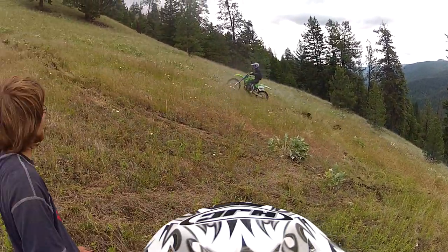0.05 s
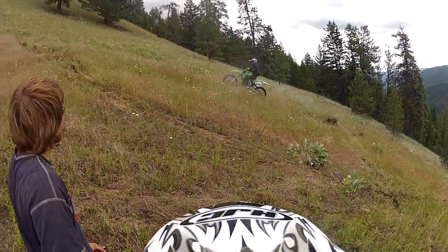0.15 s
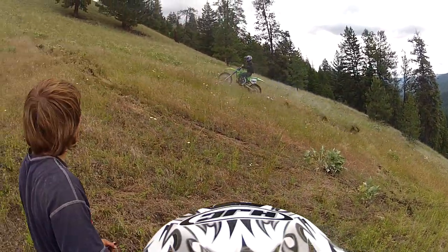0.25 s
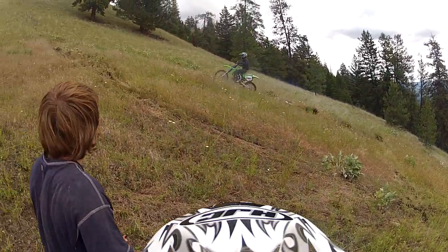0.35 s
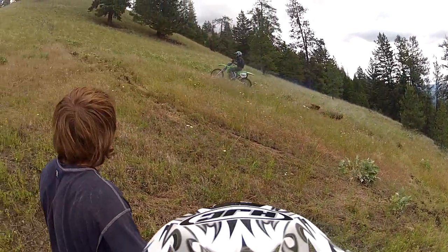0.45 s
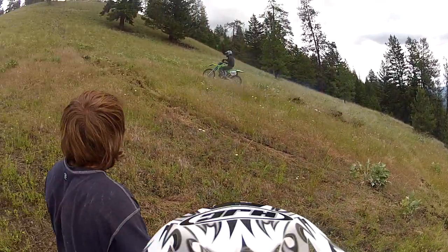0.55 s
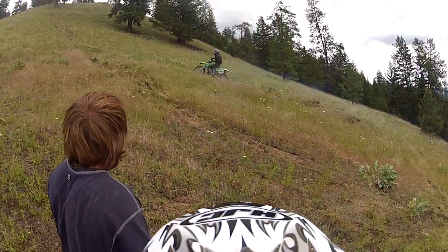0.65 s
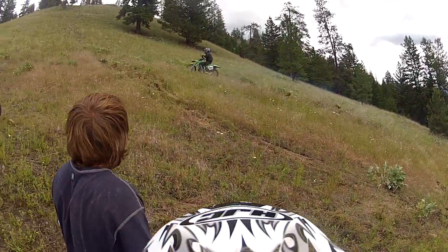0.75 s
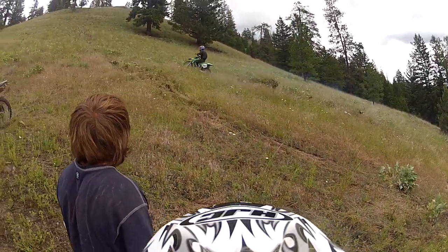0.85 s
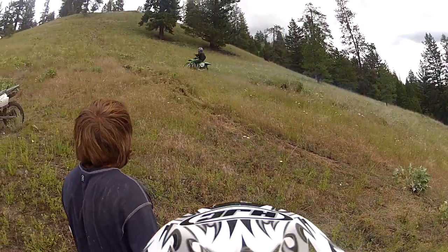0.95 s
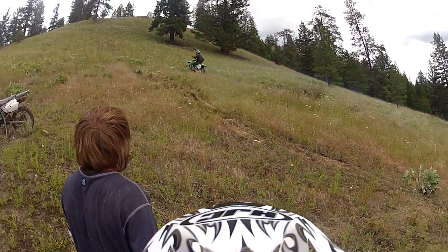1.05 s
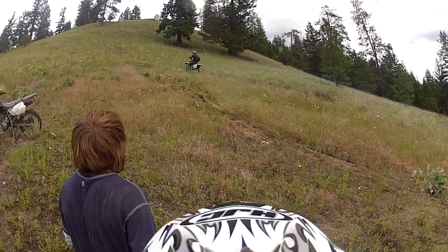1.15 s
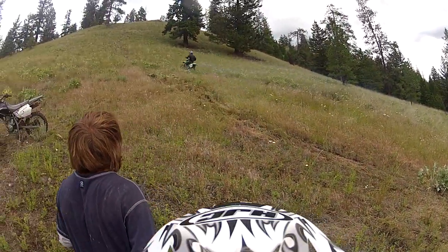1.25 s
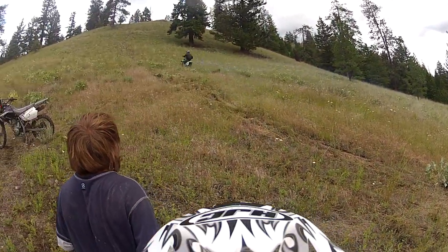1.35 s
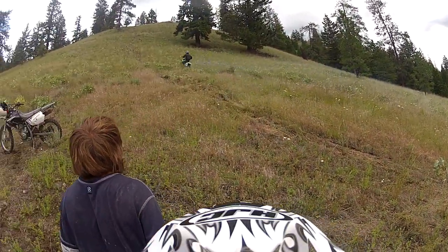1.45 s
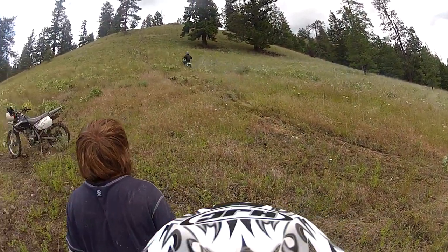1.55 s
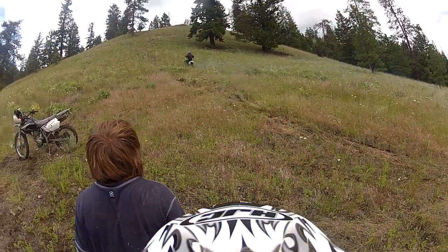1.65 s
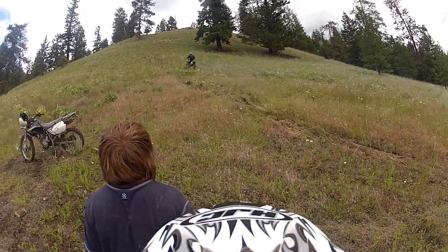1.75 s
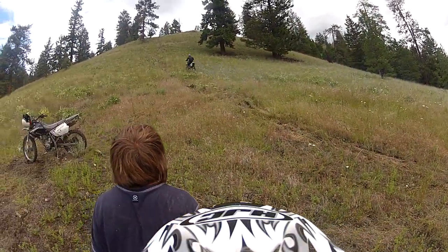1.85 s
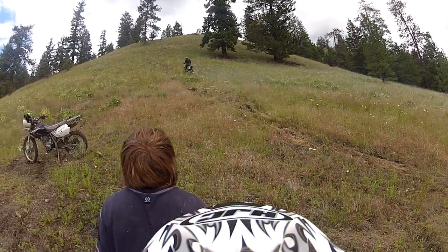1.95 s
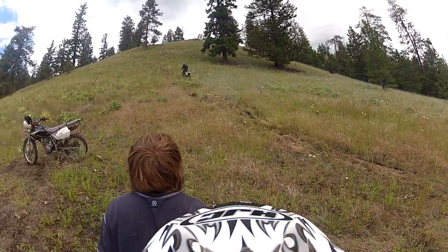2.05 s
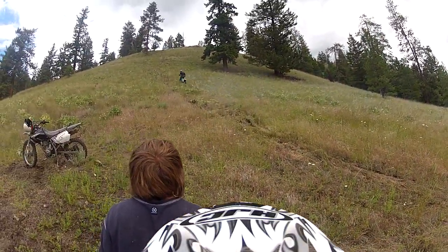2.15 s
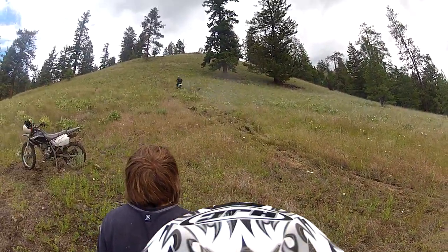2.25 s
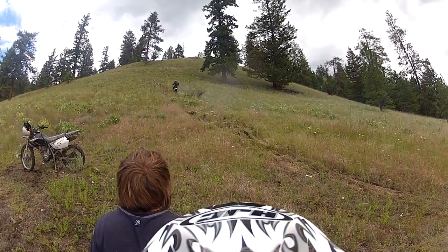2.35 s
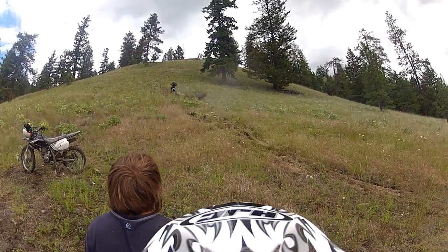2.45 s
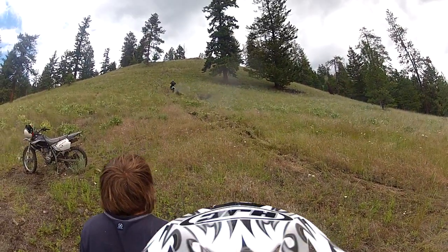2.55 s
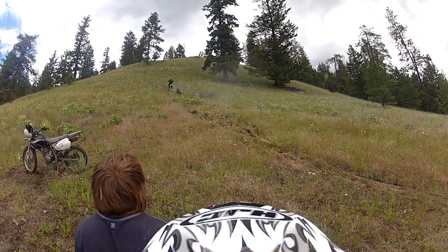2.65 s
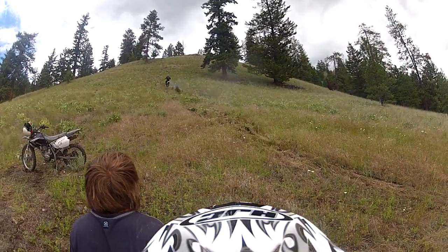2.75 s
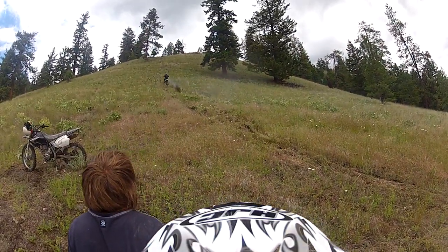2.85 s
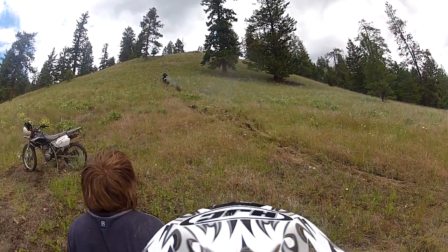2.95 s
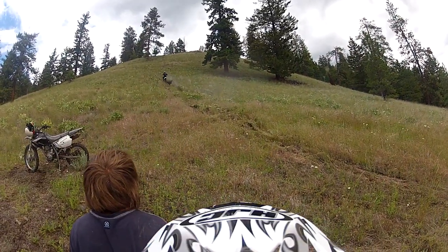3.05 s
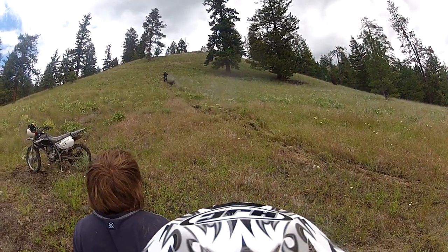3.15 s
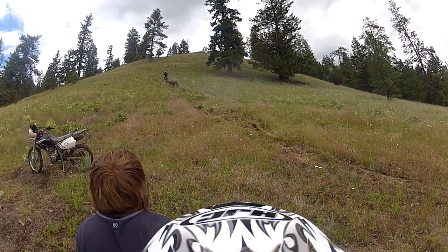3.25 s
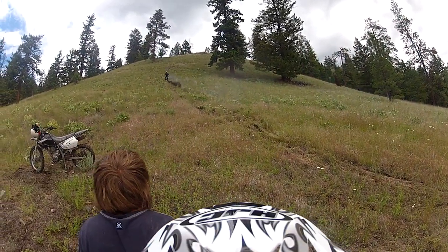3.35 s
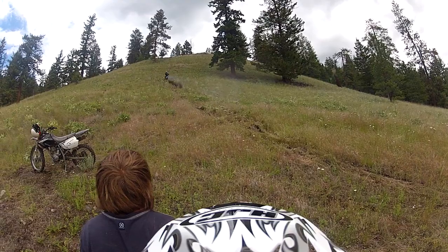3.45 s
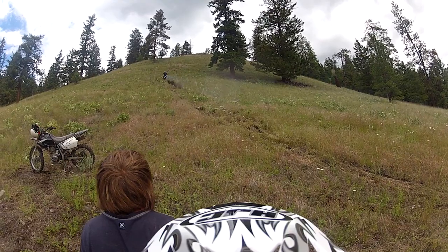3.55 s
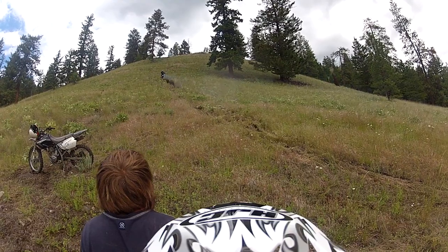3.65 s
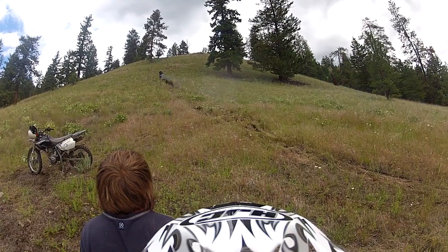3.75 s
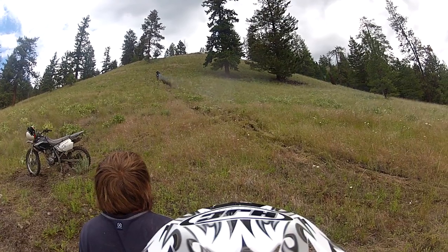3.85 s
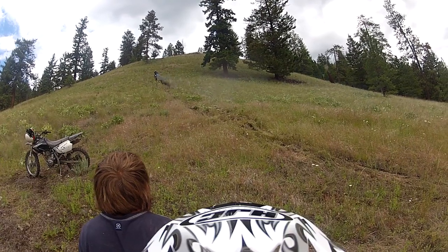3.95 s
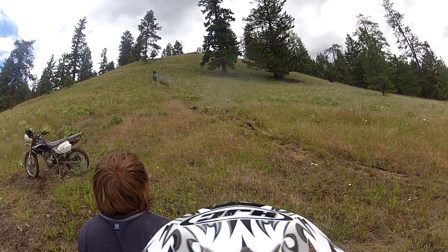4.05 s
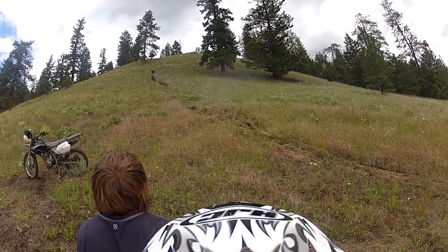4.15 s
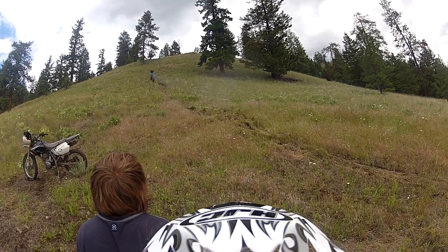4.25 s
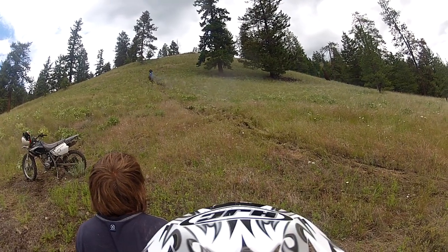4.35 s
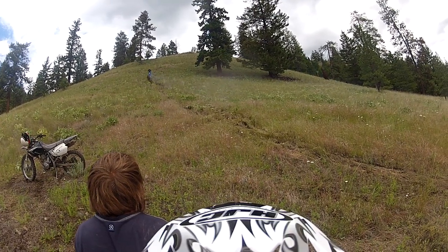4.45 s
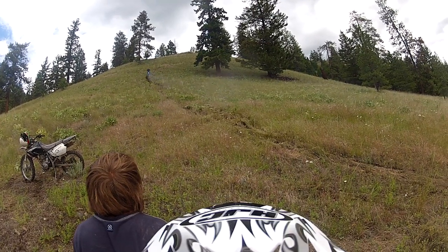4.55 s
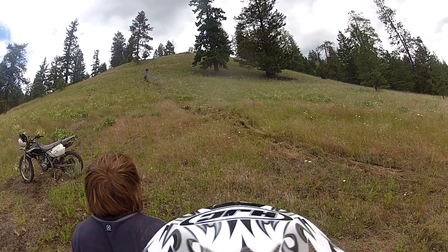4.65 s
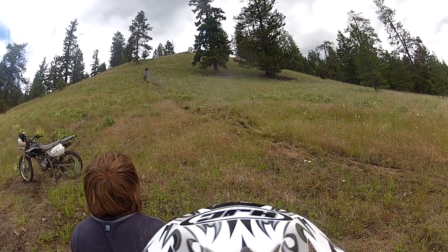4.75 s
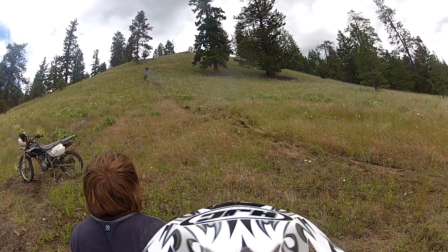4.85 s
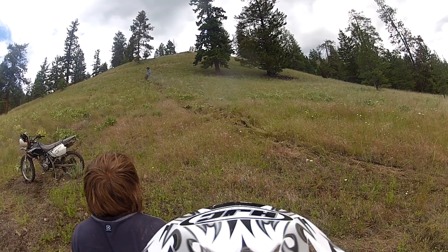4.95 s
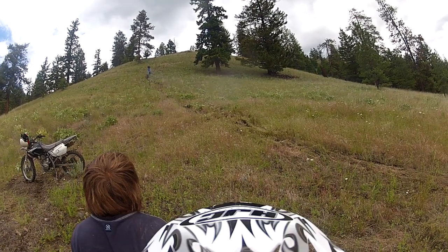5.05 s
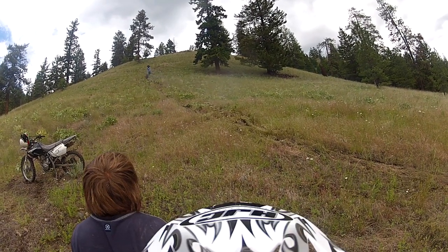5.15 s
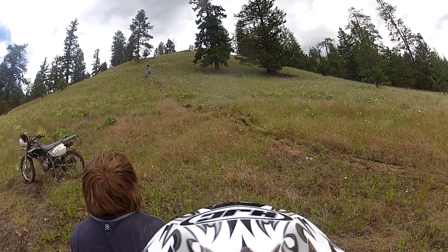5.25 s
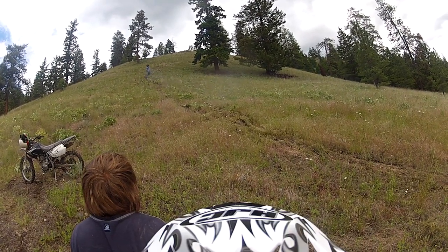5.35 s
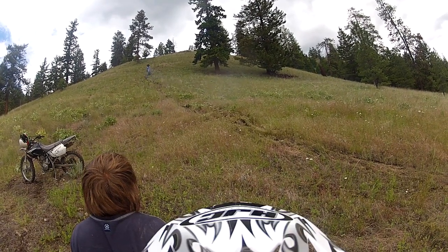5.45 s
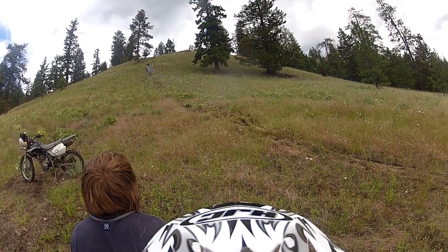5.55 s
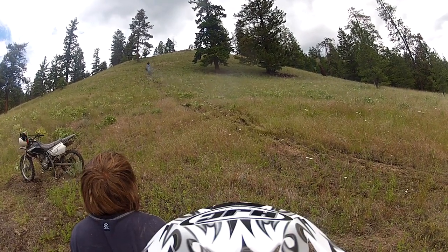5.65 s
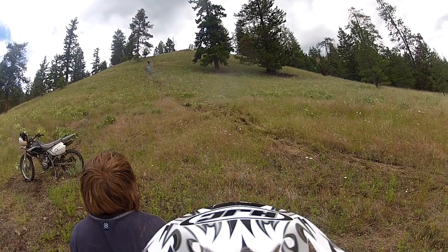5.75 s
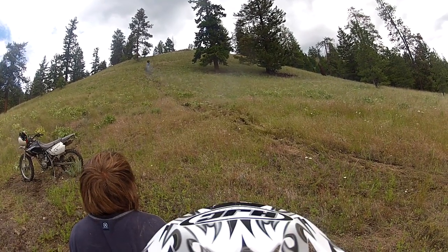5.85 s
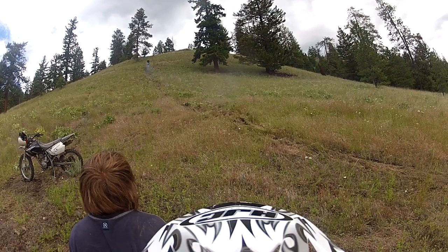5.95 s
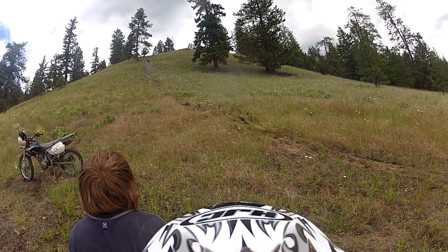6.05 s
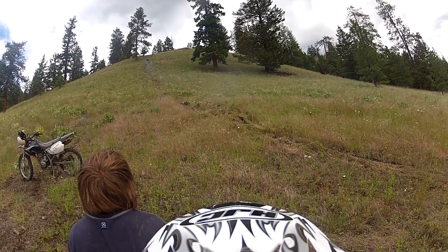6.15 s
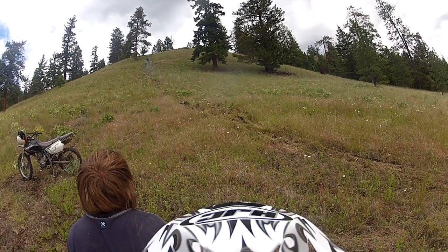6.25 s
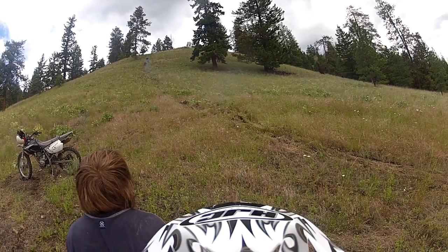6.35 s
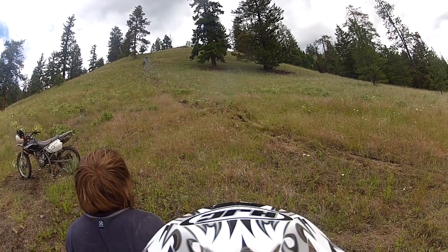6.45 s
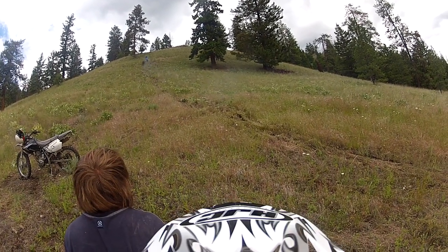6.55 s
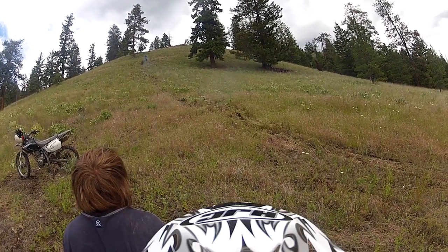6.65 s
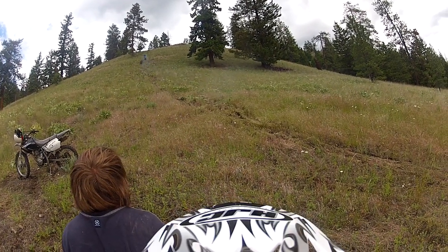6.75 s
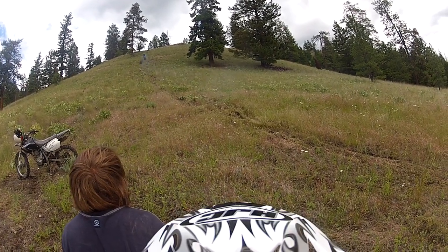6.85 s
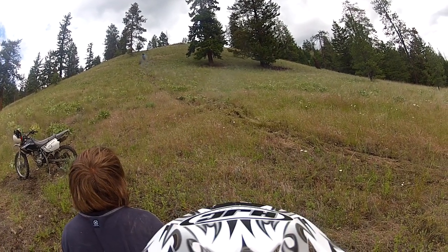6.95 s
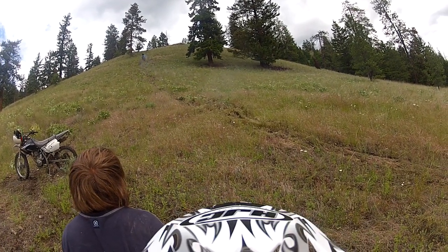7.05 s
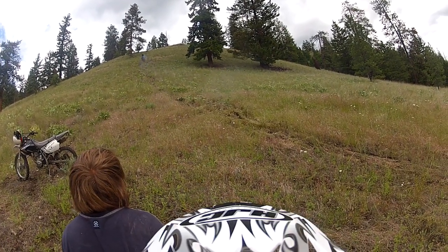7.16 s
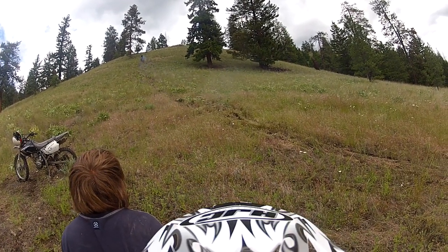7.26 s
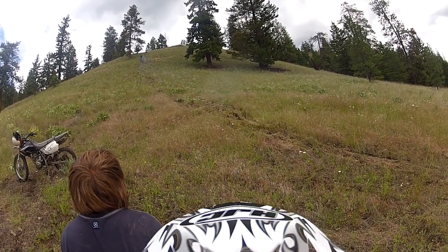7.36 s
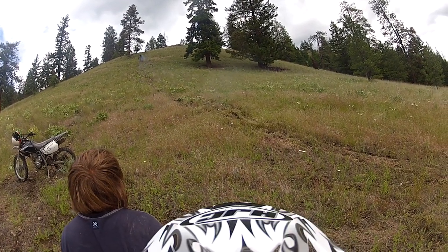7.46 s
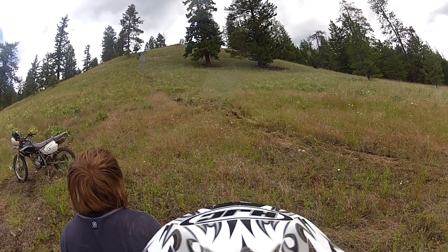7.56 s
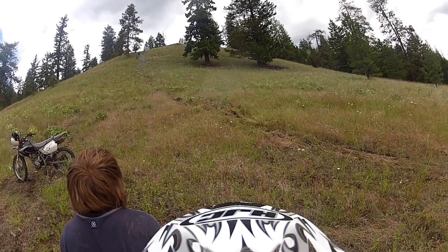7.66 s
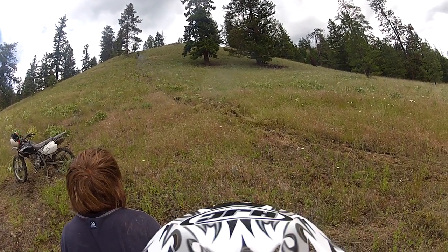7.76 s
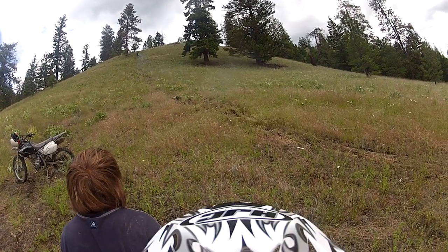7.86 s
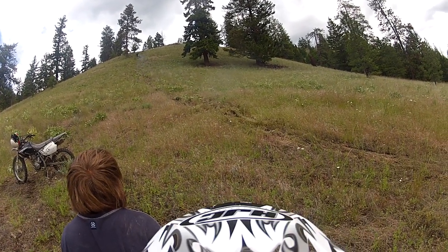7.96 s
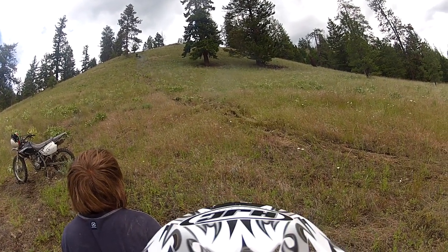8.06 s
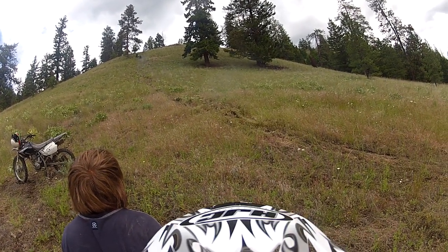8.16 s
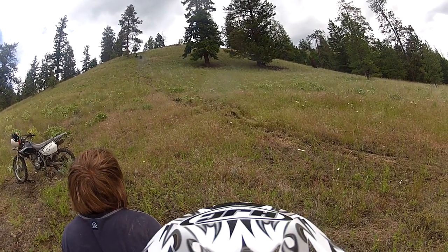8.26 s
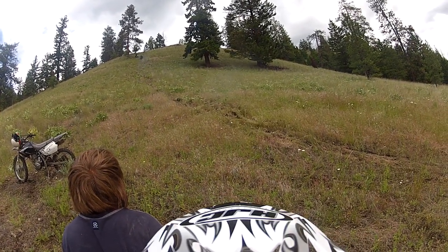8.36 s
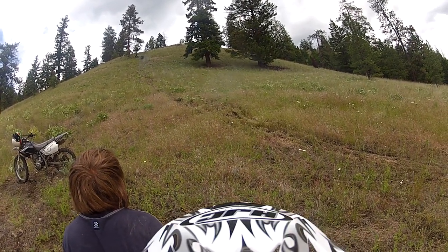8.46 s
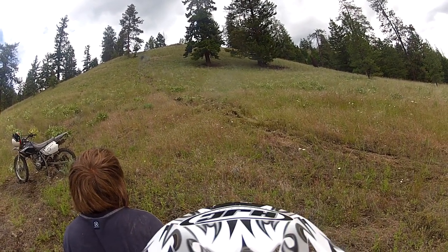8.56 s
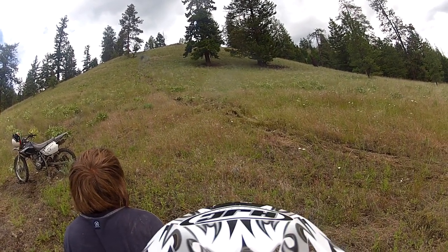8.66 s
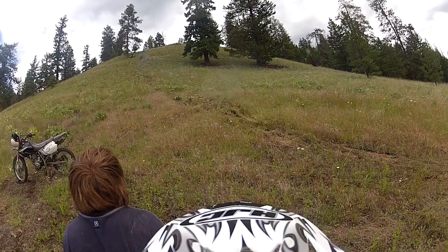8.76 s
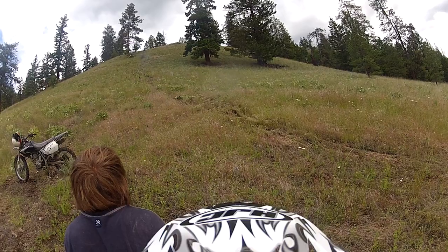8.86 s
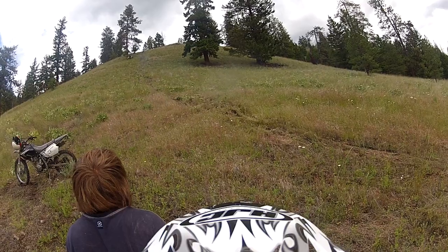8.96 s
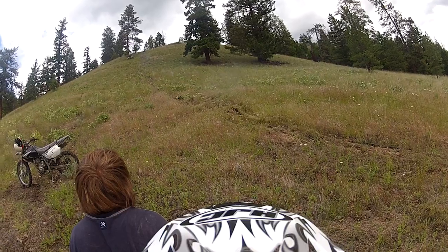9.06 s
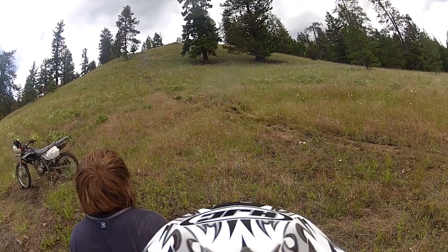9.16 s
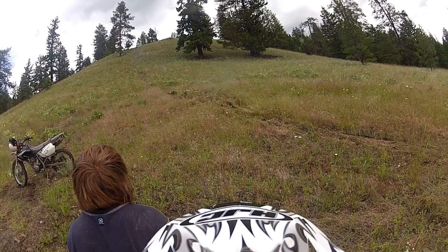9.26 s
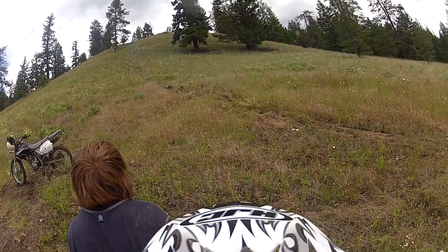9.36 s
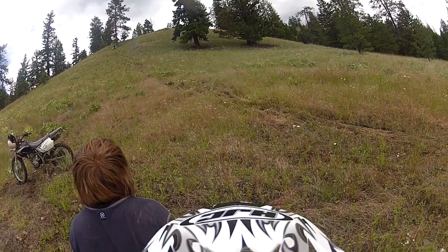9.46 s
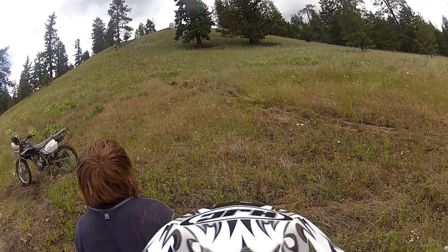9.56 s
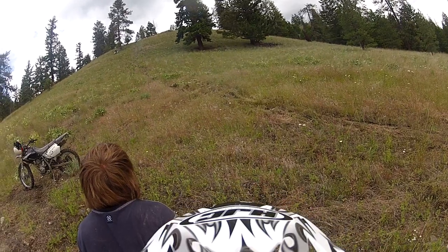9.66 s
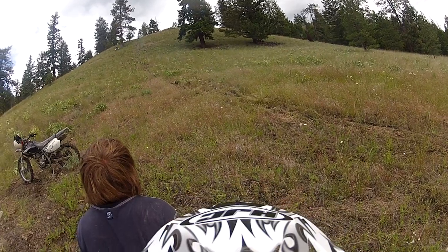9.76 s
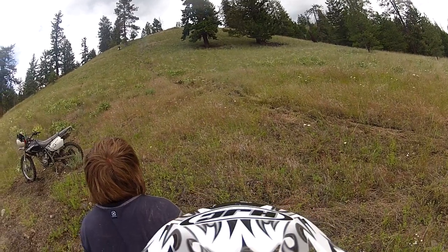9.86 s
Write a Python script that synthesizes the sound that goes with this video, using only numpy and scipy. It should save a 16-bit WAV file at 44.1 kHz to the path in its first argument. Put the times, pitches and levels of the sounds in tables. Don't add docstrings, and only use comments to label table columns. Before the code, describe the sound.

Buzzing dirt bike engine surges and sags up a grassy hill, fading with distance, two throttle blips, faint idle, light wind, final mount clicks.

```python
import sys
import numpy as np
from scipy import signal
from scipy.fft import rfft, irfft, next_fast_len
from scipy.io import wavfile
from scipy.ndimage import uniform_filter1d, map_coordinates

SR = 44100
rng = np.random.default_rng(int(sys.argv[2]) if len(sys.argv) > 2 else 0)


def decibels_to_gain(level_db):
    exponent = np.asarray(level_db, float) / 20
    return 10 ** exponent


def dump_mix(stems):
    frames = np.atleast_2d(stems).T
    limited = np.clip(frames, -1, 1)
    pcm = np.round(limited * 32767).astype(np.int16)
    wavfile.write(sys.argv[1], SR, pcm)


N = 437031

# [t/s, firing f/Hz]
FREE_SPIN = [(0.0, 134.6), (0.408, 148.5), (0.815, 157.1), (1.223, 140.7), (1.631, 147.5), (2.038, 156.0),
             (2.446, 136.1), (2.854, 143.7), (3.261, 131.3), (3.669, 145.6), (4.076, 151.0), (4.484, 137.2),
             (4.892, 132.3), (5.299, 143.6), (5.707, 142.2), (6.115, 145.5), (6.522, 119.9), (6.93, 130.1)]
# [t of lowest revs/s, drag f/Hz, fall t/s, recovery t/s]
BITES_LOW = [(0.053, 23.4, 0.058, 0.092), (0.187, 19.5, 0.091, 0.062), (0.247, 15.3, 0.027, 0.052),
             (0.308, 20.4, 0.051, 0.053), (0.356, 20.1, 0.021, 0.104), (0.398, 4.0, 0.024, 0.036),
             (0.487, 30.9, 0.029, 0.174), (0.623, 26.7, 0.034, 0.119), (0.779, 38.2, 0.053, 0.051),
             (0.842, 45.2, 0.062, 0.122), (0.877, 6.8, 0.036, 0.041), (0.954, 12.4, 0.043, 0.029),
             (1.0, 33.3, 0.047, 0.192), (1.012, 11.3, 0.038, 0.038), (1.146, 11.3, 0.017, 0.044),
             (1.152, 17.0, 0.049, 0.125), (1.32, 25.1, 0.048, 0.088), (1.428, 34.6, 0.045, 0.111),
             (1.571, 26.2, 0.081, 0.108), (1.579, 13.0, 0.043, 0.021), (1.638, 6.0, 0.026, 0.026),
             (1.715, 56.0, 0.134, 0.225), (1.773, 4.1, 0.042, 0.035), (1.837, 13.2, 0.019, 0.048),
             (1.869, 27.3, 0.155, 0.3), (1.909, 4.4, 0.02, 0.032), (2.207, 24.2, 0.021, 0.097),
             (2.247, 11.4, 0.012, 0.059), (2.327, 32.9, 0.084, 0.239), (2.541, 26.6, 0.055, 0.121),
             (2.579, 8.6, 0.035, 0.083), (2.636, 27.1, 0.048, 0.095), (2.674, 4.9, 0.019, 0.058),
             (2.732, 32.4, 0.082, 0.095), (2.882, 37.2, 0.108, 0.124), (3.022, 12.8, 0.091, 0.035),
             (3.101, 8.8, 0.026, 0.055), (3.164, 27.2, 0.143, 0.129), (3.28, 31.0, 0.093, 0.223)]
BITES_HIGH = [(3.425, 16.6, 0.055, 0.041), (3.477, 22.7, 0.043, 0.037), (3.589, 4.8, 0.019, 0.111),
              (3.635, 41.3, 0.19, 0.179), (3.682, 5.0, 0.015, 0.024), (3.744, 11.5, 0.028, 0.035),
              (3.779, 44.7, 0.034, 0.143), (3.936, 16.1, 0.024, 0.047), (3.949, 34.9, 0.075, 0.149),
              (4.13, 46.2, 0.083, 0.099), (4.262, 46.3, 0.106, 0.123), (4.381, 36.1, 0.036, 0.09),
              (4.468, 29.5, 0.055, 0.134), (4.577, 21.9, 0.044, 0.075), (4.722, 9.4, 0.02, 0.021),
              (4.79, 48.4, 0.112, 0.138), (4.838, 2.8, 0.023, 0.033), (5.019, 33.8, 0.045, 0.127),
              (5.061, 7.3, 0.045, 0.021), (5.134, 17.7, 0.038, 0.056), (5.231, 44.4, 0.118, 0.125),
              (5.377, 37.9, 0.04, 0.07), (5.495, 42.7, 0.08, 0.112), (5.615, 36.9, 0.037, 0.132),
              (5.762, 50.5, 0.044, 0.136), (5.86, 48.5, 0.044, 0.091), (5.949, 55.4, 0.087, 0.155),
              (6.11, 7.6, 0.055, 0.049), (6.158, 28.4, 0.032, 0.077), (6.3, 13.8, 0.028, 0.037),
              (6.385, 6.1, 0.038, 0.021), (6.426, 42.6, 0.165, 0.137), (6.648, 18.8, 0.096, 0.104),
              (6.733, 10.3, 0.081, 0.03), (6.855, 36.3, 0.042, 0.454)]
# [t/s, firing f/Hz]
BLIPS = [
    [(6.91, 96.6), (6.97, 82.9), (7.04, 65.93), (7.218, 65.37), (7.306, 76.94), (7.464, 109.5),
     (7.497, 117.6), (7.57, 91.9), (7.658, 63.36)],
    [(7.75, 56.16), (7.864, 75.9), (7.952, 79.3), (8.034, 105.7), (8.07, 120.1), (8.144, 108),
     (8.191, 107.6)],
]


def firing_rate():
    t = np.arange(0, N / SR, 1 / 1000)
    hz = np.interp(t, *np.transpose(FREE_SPIN))
    for s, drag_hz, fall_s, recover_s in list(BITES_LOW) + list(BITES_HIGH):
        falling = np.clip(1 + (t - s) / fall_s, 0, 1) ** 0.85
        recovering = np.clip(1 - (t - s) / recover_s, 0, 1)
        hz = hz - drag_hz * np.where(t < s, falling, recovering)
    blips = np.interp(t, *np.transpose(BLIPS[0] + BLIPS[1]))
    hz = np.where(t < BLIPS[0][0][0], hz, blips)
    chatter, chatter_per_s = 0.004, 40
    hz = uniform_filter1d(hz, size=7) * (1 + chatter * wobble(t * chatter_per_s))
    return np.interp(np.arange(N) / SR, t, hz)


# [t/s, distance loss level/dB, first ground notch f/Hz, ground echo share 0-1]
PATH = [(0.0, -1, 620, 0.4), (0.5, 1.3, 240, 0.16), (1.5, 1.6, 191, 0.43), (2.2, 5, 590, 0.08),
        (3.0, 4, 313, 0.54), (4.5, 9, 314, 0.67), (6.0, 14.5, 259, 0.81), (7.0, 13, 250, 0.86),
        (8.2, 15.5, 240, 0.96)]
# [f/Hz, level/dB]
BASS = [(55.0, -37), (80.0, -29.5), (110.0, -18.5), (150.0, -11), (200.0, -10.5), (280.0, -6.5),
        (450.0, -15)]
# [level/dB, share of distance loss]
LOW_ORDERS = [
    (1.4, 0.63),
    (2.3, 1),
    (-5.5, 1),
]


def low_orders(hz, turns, effort_db):
    loss_db, notch_hz, echo = curves(PATH)
    low = 0
    for k, ((db, far), lag) in enumerate(zip(LOW_ORDERS, (1.3, 1.5, 1.8))):
        order = k + 1
        f = order * hz
        ground = np.abs(1 + np.clip(echo, 0, .97) * np.exp(-1j * np.pi * f / notch_hz))
        level_db = db - far * loss_db + effort_db + along(BASS, f) + 20 * np.log10(ground)
        drift_db = .45 * order * wobble(turns / 3 + 700 * k)
        low = low + decibels_to_gain(level_db + drift_db) * np.cos(order * 2 * np.pi * turns - lag)
    return low


# [f/Hz, level/dB]
BARK_BEHIND = [(190, -17.5), (320, -3), (361, -6), (408, -9), (548, 7), (686, -2.5), (751, -0.5),
               (867, -13.5), (1000, -28), (1300, -18), (2200, -120)]
# [f/Hz, level/dB]
BARK_NEAR = [(190, -7), (320, 13), (380, 18), (465, -3), (570, 3), (680, 2), (770, 4.5), (870, -16),
             (1000, -13), (1300, -19), (2200, -120)]
# [f/Hz, level/dB]
BARK_LUGGING = [(140, -42), (230, 6.5), (329, 0), (415, -12.5), (561, 2), (662, -12.5), (777, -10.5),
                (842, -37), (1000, -23), (1300, -36), (2200, -120)]
# [t/s, share of the colour from behind 0-1]
BEHIND = [(0, 0.26), (.45, 0.12), (1.2, 0.8), (1.9, 1), (2.6, 1)]


def exhaust_bark(turns, lugging, gas):
    angle = 2 * np.pi * turns
    harmonics = (1 - lugging) * np.cos(4 * angle) + sum(np.cos(k * angle) for k in range(5, 18))
    pulses = unit(harmonics) + (.36 + .8 * lugging) * gas
    behind = np.clip(curves(BEHIND)[0], 0, 1)
    pulling = behind * colour(pulses, BARK_BEHIND) + (1 - behind) * colour(pulses, BARK_NEAR)
    mixed = (1 - lugging) * pulling + lugging * colour(pulses, BARK_LUGGING)
    return steady(patchy(mixed, depth_db=2.6))


# [t/s, level/dB]
LOAD = [(0, 2.5), (.4, -4), (.75, -1.5), (1.5, -0.5), (1.9, -0.5), (2.0, -5.5), (2.17, -9), (2.24, 4.5),
        (2.5, 1.5), (2.9, 0), (3.2, 0), (3.6, 1.5), (4.2, -1.5), (5, 2), (5.7, 0), (6.3, -0.5), (7.3, -1),
        (7.5, 3), (8, 0), (8.12, -1)]
# [f/Hz, width f/Hz, level/dB]
FINS = [(3600, 1400, 4)]
# [f/Hz, level/dB]
GAS = [(700, -28), (1200, -21), (1700, -14), (2400, -4), (4000, 0)]
# [f/Hz, width f/Hz, level/dB]
CAVITY = [(2045, 80, -9)]
# [f/Hz, width f/Hz, level/dB]
SILENCER = [(1660, 120, 3), (2190, 130, 3), (2730, 130, 4), (3350, 150, 3), (4110, 110, 3), (5330, 130, 4)]
# [f/Hz, level/dB per Hz]
RASP_NEAR = [(530, -23.5), (880, -3), (990, 1.5), (1310, -1), (1900, 1), (2100, -11.5), (2600, -9.5),
             (3450, -8.5), (4050, -9), (4350, -14), (4950, -15), (5300, -28.5), (5900, -29.5), (7670, -74),
             (13000, -120)]
# [f/Hz, level/dB per Hz]
RASP_FAR = [(530, -33.5), (880, 3), (1200, 4), (1450, -2.5), (1700, -6), (1900, -8.5), (2210, -11.5),
            (2500, -15.5), (3120, -17.5), (3400, -15.5), (4340, -29), (5370, -32), (5900, -40.5),
            (7670, -59), (13000, -120)]
# [t/s, share of the distant colour 0-1]
AWAY = [(0, 0), (1.2, 0.52), (2.3, 0.8), (2.7, 0.96), (5, 1)]


def exhaust_rasp(turns, fired, lugging, aim, gas, spit):
    away = np.clip(curves(AWAY)[0], 0, 1)
    load_db, = curves(LOAD)
    cracks = -(1 - .9 * lugging) * unit(fired * decibels_to_gain(.6 * wobble(turns + 900)))
    blunt = uniform_filter1d(cracks, size=15)
    sharp = shell(cracks - blunt, FINS)
    cracks = .7 * decibels_to_gain(load_db) * blunt + aim * decibels_to_gain(2 * wobble(turns / 2 + 300)) * sharp
    cracks = cracks + .5 * (1 - lugging) * aim * colour(spit, GAS)
    blast = shell(cracks + (.7 + .35 * away) * colour(gas, GAS), CAVITY)
    rasp = (1 - away) * colour(blast, RASP_NEAR) + away * colour(shell(blast, SILENCER), RASP_FAR)
    return decibels_to_gain(.5 * load_db) * steady(patchy(rasp, depth_db=1.8))


# [f/Hz, width f/Hz, level/dB]
TAIL_CAP = [(2530, 260, 24), (3310, 200, 33), (3670, 150, 26), (5400, 110, 18)]
# [t/s, level/dB over the rasp]
PINGING = [(2.5, -62), (4.5, -37), (5.9, -25), (6.15, -27), (6.45, -23), (6.7, -19), (7.1, -27), (7.5, -18),
           (7.75, 5), (7.95, -6.5), (8.1, -9), (8.19, -4)]


def tail_cap(fired, gas, spit):
    struck = .5 * unit(fired) + .6 * gas + .5 * spit
    ringing = shell(struck, TAIL_CAP) - struck
    radiated = colour(ringing, [(2000, -1.5), (2500, 7), (3800, -2), (4300, -3), (5900, -8.5)])
    return decibels_to_gain(curves(PINGING)[0]) * radiated


# [t/s, effort level/dB]
THROTTLE = [(0.0, -2), (1.66, -2), (1.81, -0.5), (2.01, -2.5), (2.395, -1.4), (2.54, -3.0), (4.76, -3.5),
            (4.924, -2.5), (5.87, -2.5), (5.99, -2), (6.805, -3), (7.015, -5), (7.38, -5.5), (7.492, -4.5),
            (7.62, -6), (7.977, -5.5), (8.05, -3.5), (8.19, -4)]
# [t/s, crack strength]
AIM = [(0, 0.042), (.5, 0.45), (.72, 0.33), (.9, 0.67), (1.7, 0.46), (1.9, 0.67), (2.4, 1.37), (2.7, 0.073),
       (3.15, 0.26), (3.5, 0.77), (4.3, 0.06), (6.5, 0.073), (8.2, 0.16)]
# [level/dB, share of distance loss, dB per dB of effort, dB per Hz of revs, lugging level/dB, dB per unit of aim]
NOTE = [
    (-14, 0.074, 2, 0.044, -5.5, -1.5),
    (-23, 0.51, 1.7842, 0.18, -8, 0),
]


def engine():
    hz = firing_rate()
    effort_db, aim, loss_db = curves(THROTTLE)[0], curves(AIM)[0], curves(PATH)[0]
    lugging = np.clip((98 - hz) / 20, 0, 1)
    cruise_hz = 115
    bark_db, rasp_db = [
        db - far * loss_db + push * effort_db + rev * (hz - cruise_hz) + lug_db * lugging + aim_db * (aim - 1)
        for db, far, push, rev, lug_db, aim_db in NOTE]
    turns = np.cumsum(hz) / SR
    turns = turns + (.002 + .009 * lugging) * wobble(turns)
    fired = np.diff(np.floor(turns), prepend=0) > 0
    size = decibels_to_gain(0.35 * wobble(turns))
    phase = turns % 1
    gas = unit((.6 + np.exp(-phase / .3)) * rng.standard_normal(N))
    spit_s = .0016
    spit = unit(np.exp(-phase / hz / spit_s) * rng.standard_normal(N))
    low = np.sqrt(2) * low_orders(hz, turns, effort_db)
    bark = decibels_to_gain(bark_db) * exhaust_bark(turns, lugging, gas)
    rasp = exhaust_rasp(turns, fired, lugging, aim, gas, spit) + tail_cap(fired, gas, spit)
    return span(FREE_SPIN + BLIPS[1]) * (size * (low + bark) + decibels_to_gain(rasp_db) * rasp)


# [t/s, firing f/Hz, level/dB]
IDLE = [(8.19, 43.32, -41.6), (8.3, 30.66, -44.2), (8.38, 24.81, -43.2), (8.47, 35.62, -39.8),
        (8.56, 35.19, -42.9), (8.65, 37.36, -40.1), (8.74, 42.91, -41.4), (8.82, 28.86, -44.3),
        (8.92, 25.58, -42.4), (9.02, 29.61, -43.4), (9.12, 33.8, -42.8), (9.19, 24.66, -44.5),
        (9.27, 26.71, -43.9), (9.42, 26.07, -43.9), (9.53, 29.07, -43.7), (9.6, 31.53, -42.8),
        (9.7, 26.36, -44.9), (9.9, 26.9, -44.9)]
# [f/Hz, level/dB per Hz]
PUTT_LIVELY = [(35, -47), (60, -5.5), (151, -4.5), (175, 1), (211, -34), (330, -43), (430, -40),
               (730, -120)]
# [f/Hz, level/dB per Hz]
PUTT_SLOW = [(35, -47), (70, -13), (110, -6.5), (150, -2), (180, -6), (215, -24), (430, -44), (730, -120)]
# [t/s, level/dB]
MURMUR = [(8.2, -40), (8.254, -45.5), (8.43, -41.5), (8.564, -46.5), (9.062, -45.5), (9.3, -52),
          (9.734, -51.5), (9.74, -57)]
# [f/Hz, level/dB per Hz]
MURMUR_COLOUR = [(150, -42), (250, -7), (293, -7.5), (413, -10.5), (531, -2.5), (1450, -31.5),
                 (3390, -32.5), (4590, -40.5), (5030, -42.5), (5900, -51), (7670, -75), (13000, -120)]
# [t/s, level/dB]
POPS = [(8.206, -36), (8.2405, -23), (8.262, -28), (8.3505, -39), (8.425, -31), (8.452, -32), (8.913, -37),
        (8.9505, -37), (9.368, -45)]


def idle():
    hz, putt_db = curves(IDLE)
    turns = np.cumsum(hz * (np.arange(N) / SR > IDLE[0][0])) / SR + .65
    fired = np.diff(np.floor(turns + .035 * wobble(turns)), prepend=0) > 0
    thuds = unit(fired * decibels_to_gain(1.8 * wobble(turns + 500))) + .25 * rng.standard_normal(N)
    settled_hz, settling_hz = 27, 6
    lively = np.clip((hz - settled_hz) / settling_hz, 0, 1)
    putts = lively * colour(thuds, PUTT_LIVELY) + (1 - lively) * colour(thuds, PUTT_SLOW)
    throb = decibels_to_gain(2.2 * np.cos(2 * np.pi * (turns - .2)) + 1.3 * wobble(turns * 1.2))
    murmur = decibels_to_gain(curves(MURMUR)[0]) * colour(throb * rng.standard_normal(N), MURMUR_COLOUR)
    out = span(IDLE + [(11, 0, 0)]) * (decibels_to_gain(putt_db - 7) * putts + murmur)
    t = np.arange(2000) / SR
    pop = np.sin(2 * np.pi * 560 * t) * (1 - np.exp(-t / .001))
    for s, db in POPS:
        out[round(s * SR):][:len(t)] += decibels_to_gain(db - 60 * t / .05) * pop
    return out


# [t/s, level/dB]
CLICKS = [
    (9.7478, -6),
    (9.765, -16),
    (9.7805, -23),
    (9.69, -43),
]
# [f/Hz, level/dB, t60/s]
CASE = [(687, 5.5, 0.024), (366, -6.5, 0.043), (2080, 7, 0.011), (3680, 9, 0.0047), (2750, 2, 0.0097),
        (80, -18, 0.077)]
# [t/s, level/dB]
RUB = [(9.752, -34), (9.768, -36), (9.779, -29), (9.82, -34), (9.85, -36), (9.87, -47), (9.91, -52)]
# [f/Hz, level/dB per Hz]
RUB_COLOUR = [(760, -50), (1300, -16), (1600, -16), (1850, -2), (2200, 0), (2500, -10), (2900, -4),
              (3750, -7), (4300, -20), (5000, -9), (5900, -22), (7000, -60)]
# [f/Hz, width f/Hz, level/dB]
SQUEAK = [(2150, 130, 9), (2900, 110, 8), (3800, 130, 8), (5100, 120, 6)]


def mount():
    out = np.zeros(N + SR)
    t = np.arange(SR // 10) / SR
    ring = sum((-1) ** k * decibels_to_gain(db - 60 * t / t60) * np.sin(2 * np.pi * hz * t)
               for k, (hz, db, t60) in enumerate(CASE))
    for s, db in CLICKS:
        out[round(s * SR):][:len(t)] += decibels_to_gain(db - 6.0) * ring * (1 - np.exp(-t / 0.00083))
    high_db, = curves(RUB)
    thud_db, fall_db_per_s, end_db = -27, 236, -50
    low_db = np.maximum(thud_db - fall_db_per_s * (np.arange(N) / SR - RUB[0][0]), end_db).clip(max=0)
    slips = decibels_to_gain(1.2 * wobble(np.arange(N) * 160 / SR))
    high = colour(shell(slips * rng.standard_normal(N), SQUEAK), RUB_COLOUR)
    low_colour = [(200, -12), (400, -7), (680, -2.0), (1100, -10), (1500, -34)]
    low = colour(slips * rng.standard_normal(N), low_colour)
    return out[:N] + span(RUB) * (decibels_to_gain(high_db) * high + decibels_to_gain(low_db) * low)


# [f/Hz, t60/s]
SLOPE_DECAY = [(100, 0.17), (600, 0.082), (2000, 1), (6000, 0.15)]


def slope(x):
    hz, t, z = signal.stft(rng.standard_normal(SR), SR, nperseg=256)
    tail = signal.istft(z * decibels_to_gain(-60 * t / along(SLOPE_DECAY, hz)[:, None]), SR, nperseg=256)[1]
    delayed = np.pad(x, (1500, 0))
    return signal.fftconvolve(delayed, tail / np.linalg.norm(tail))[:N]


# [t/s, level/dB]
BREEZE = [(0, -62), (3, -51), (6.4, -45), (9.91, -68)]
# [t/s, peak level/dB]
GUSTS = [(0.03, -46), (0.52, -29), (0.94, -43), (1.46, -36), (5.46, -59), (7.23, -62), (7.73, -42),
         (8.4, -47), (9.52, -67)]
# [f/Hz, level/dB per Hz]
BUFFETING = [(15, -18), (32, -6), (50, -33), (110, -5), (200, 2), (400, -92)]


def wind():
    t = np.arange(N) / SR
    db_per_s = 45
    gusts = sum(decibels_to_gain(db - db_per_s * np.abs(t - s)) for s, db in GUSTS)
    strength = decibels_to_gain(curves(BREEZE)[0]) + gusts
    lumps = decibels_to_gain(4.4 * wobble(np.arange(N) * 9 / SR))
    return strength * decibels_to_gain(1.5) * colour(lumps * rng.standard_normal(N), BUFFETING)


# [t/s, peak level/dB, length t/s]
RUSTLES = [(8.672, -60, .03), (9, -57, 0.03), (9.152, -60.5, .03), (9.357, -56.5, 0.079),
           (9.437, -62, .012), (9.51, -59, .012), (9.597, -60, 0.029)]
# [f/Hz, level/dB per Hz]
CLOTH = [(900, -31), (1600, 4), (2600, -1), (3500, 3), (4300, -8), (5100, -5), (5900, -23), (7000, -68)]


def rustle():
    t = np.arange(N) / SR
    swells = sum(decibels_to_gain(db) * np.exp(-np.abs(t - s) / length) for s, db, length in RUSTLES)
    return swells * colour(rng.standard_normal(N), CLOTH)


def patchy(x, depth_db):
    z = signal.stft(x, nperseg=512)[2]
    field = uniform_filter1d(rng.standard_normal(z.shape), size=2, axis=0)
    field = uniform_filter1d(field, size=16, axis=1)
    return signal.istft(z * decibels_to_gain(depth_db * unit(field)), nperseg=512)[1][:N]


def shell(x, modes):
    m = next_fast_len(N + 4096)
    f = np.fft.rfftfreq(m, 1 / SR)
    response = 1
    for hz, width, db in modes:
        response = response + (decibels_to_gain(db) - 1) * 1j * f * width / (hz * hz - f * f + 1j * f * width)
    return irfft(rfft(x, m) * response, m)[:N]


def colour(x, spectrum):
    cep = irfft(np.log(decibels_to_gain(along(spectrum, np.fft.rfftfreq(8192, 1 / SR))) + 1e-5))
    cep[1:4096] *= 2
    cep[4097:] = 0
    impulse = irfft(np.exp(rfft(cep)))[:4096]
    return unit(signal.oaconvolve(x, impulse)[:N])


def steady(x):
    return x / np.sqrt(np.abs(uniform_filter1d(x ** 2, size=4000)) + 1e-9)


def unit(x):
    return x / np.sqrt(np.mean(x ** 2) + 1e-20)


def wobble(steps):
    return map_coordinates(rng.standard_normal(6000), [steps], mode="wrap")


def curves(rows):
    s, *cols = np.transpose(rows)
    return [np.interp(np.arange(N) / SR, s, c) for c in cols]


def span(rows):
    t = np.arange(N) / SR
    opening = np.clip((t - rows[0][0]) / 0.00074 + 1, 0, 1)
    closing = np.clip((rows[-1][0] - t) / 0.00356 + 1, 0, 1)
    return opening * closing


def along(points, hz):
    f, v = np.transpose(points)
    return np.interp(np.log(hz + 1), np.log(f + 1), v)


def scene():
    bike = engine()
    return (bike + decibels_to_gain(-14) * slope(bike) + idle() + mount() + wind() + rustle())[None]


def low_pass(x):
    return signal.sosfilt(signal.butter(12, 15720, fs=SR, output="sos"), x)


def record(dry):
    hold_hz, fade_in_s = 12000, .006
    x = dry / (1 + np.abs(dry / 1.01) ** 8) ** (1 / 8)
    x = x * np.clip(np.arange(N) / SR / fade_in_s, 0, 1)
    m = next_fast_len(N + 4096)
    hz = np.fft.rfftfreq(m, 1 / SR)
    droop = np.sinc(hz / hold_hz)
    below_half_clock = np.clip((hold_hz / 2 - hz) / 60, 0, 1)
    x = irfft(rfft(x, m) * below_half_clock / np.maximum(droop, .5), m)
    sampled = x * (1 + 2 * np.cos(2 * np.pi * hold_hz * np.arange(m) / SR))
    held = irfft(rfft(sampled) * droop, m)[:, :N]
    return low_pass(held)


dry = scene()
out = record(dry)
dump_mix(out)
```